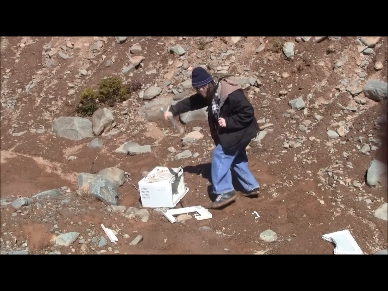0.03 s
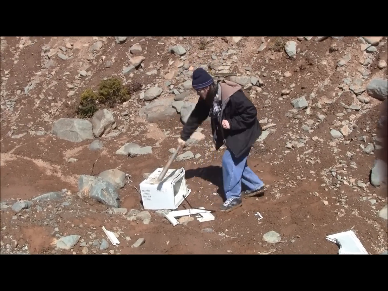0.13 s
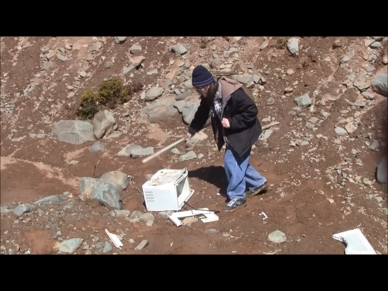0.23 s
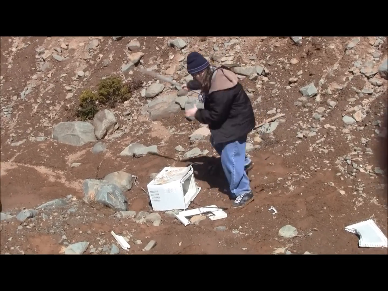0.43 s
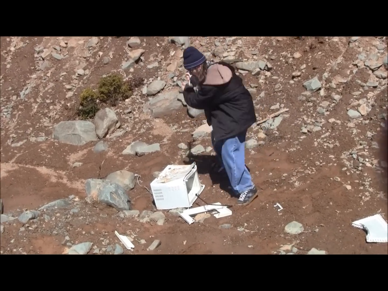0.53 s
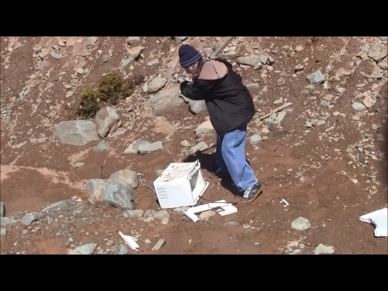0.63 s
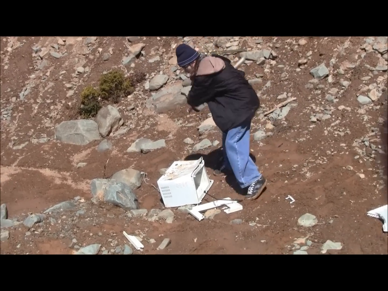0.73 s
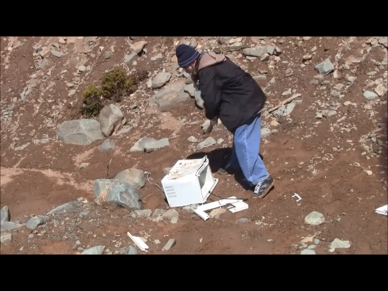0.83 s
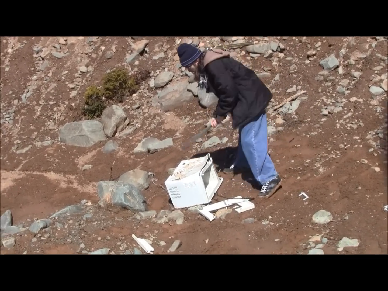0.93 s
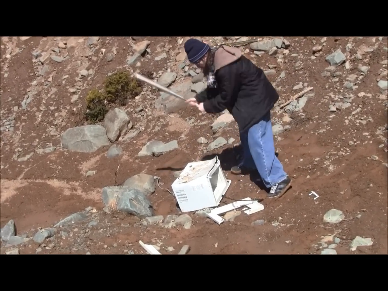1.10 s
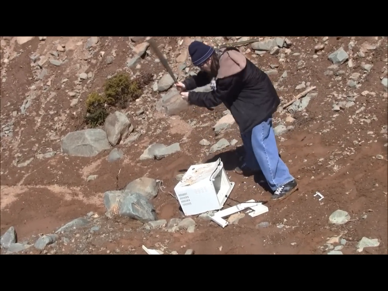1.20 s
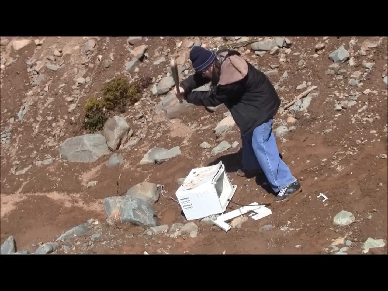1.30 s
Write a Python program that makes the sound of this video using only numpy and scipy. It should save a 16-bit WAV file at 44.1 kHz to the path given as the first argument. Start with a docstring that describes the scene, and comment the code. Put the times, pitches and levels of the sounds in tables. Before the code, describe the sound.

A hammer strikes a sheet-metal appliance casing twice, each blow a sharp crash with a hollow ring echoing off a rocky slope. Metal briefly scrapes and squeals after the second. Gravel shifts faintly underfoot.

```python
"""Hammering a metal casing outdoors

On stony ground, a little right of the microphone, a light clack leads into two blows of a long-handled
hammer on a sheet-metal appliance casing. Each is a crack, a crash of buckling panels and a hollow ring,
scattered back by the rocky slope; the box then rocks and booms. After the second blow metal scrapes and
squeals on metal. Wider in the stereo image, gravel shifts underfoot over a faint outdoor rush."""
import sys
import numpy as np
from scipy import signal
from scipy.io import wavfile

SR = 44100
rng = np.random.default_rng(int(sys.argv[2]) if len(sys.argv) > 2 else 0)


def put_to_file(sound):
    """Save the sound as 16-bit audio at rate SR, in the file named by the first command-line argument."""
    columns = np.atleast_2d(sound).T  # one column per channel
    safe = np.clip(columns, -1, 1)
    whole_steps = np.round(safe * 32767)
    wavfile.write(sys.argv[1], SR, whole_steps.astype(np.int16))


N = 59535
TIME = np.arange(N) / SR
BAND_EDGES_HZ = 25 * 2 ** (np.arange(29) / 3)

# stereo width at the microphone: (frequency [Hz], side of the casing [dB], side of air and ground [dB])
STEREO_WIDTH = [(60, -18, -13), (150, -37, -10), (500, -16, -4.5), (1200, -21.5, -9.5), (4000, -22, -9.5),
                (9500, -7.5, -10)]
# outdoor rush: (frequency [Hz], spectral density [dB])
AIR_SPECTRUM = [(25, -35), (60, -14.5), (120, -7), (220, 1), (550, 2.5), (1000, 0), (1700, -4),
                (3000, -15.5), (6000, -26), (10000, -25), (15000, -40)]
# grinding stones: (frequency [Hz], spectral density [dB])
GRAVEL_SPECTRUM = [(200, -29), (900, 1), (2000, 2), (4000, 0), (6300, -8), (9500, -3), (15000, -21)]
# gravel shifting underfoot: (peak time [s], level [dB], rise [s], t60 [s], brightness [dB/octave])
GRAVEL_SCUFFS = [(.068, -55.5, 0.004, 0.36, 4), (0.131, -40.5, 0.011, 0.35, -3),
                 (.385, -48.5, 0.0037, 0.072, 4), (0.456, -52, 0.027, 0.5, 2.5),
                 (.635, -51, .025, 0.13, -1.5), (.755, -61, 0.017, 0.086, 4), (.868, -58.5, 0.012, 1, 3.5),
                 (1.232, -58.5, 0.012, 0.17, 6), (1.256, -41.5, 0.0035, 0.18, -5)]
# resonances of the light clack: (frequency [Hz], width [Hz], gain [dB])
CLACK_RESONANCES = [(210, 28, 2.5), (608, 76, 3), (1330, 150, 5), (2760, 1200, -6.5), (4180, 870, -4),
                    (8780, 1070, -4.5)]
# pressure of metal sliding on metal: (time [s], level [dB])
SCRAPE_PRESSURE = [(.99, -73), (1.02, -37), (1.05, -27.5), (1.10, -29.5), (1.125, -32.5), (1.155, -37),
                   (1.19, -43), (1.23, -57.5)]
# hiss of the scrape: (frequency [Hz], spectral density [dB])
SCRAPE_SPECTRUM = [(100, -28), (220, 5.5), (330, 9.5), (600, 13), (1000, 2), (1600, 6.5), (3000, -6),
                   (4500, -6), (6800, -15.5), (9500, -10.5), (15000, -28)]
# squeals where the metal catches: (peak time [s], frequency [Hz], level [dB], t60 [s])
SCRAPE_SQUEALS = [(1.025, 7620, -47, .09), (1.079, 7720, -33, .1), (1.14, 7830, -47, .09),
                  (1.025, 4450, -44, .2), (1.075, 4410, -38, .16), (1.088, 5930, -46, .18),
                  (1.075, 3660, -44, .26), (1.163, 3670, -46, .19), (1.14, 4280, -48, .42),
                  (1.077, 9220, -42, .12), (1.143, 9580, -47, .11), (1.045, 9780, -44, .07),
                  (1.095, 5050, -44, .11), (1.10, 11900, -49, .09), (1.045, 6340, -47, .12),
                  (1.045, 2230, -43, .3)]
# panels booming as the box rocks: (time [s], level [dB], settled frequency [Hz], t60 [s])
PANEL_BOOMS = [(.289, -27, 519, 0.67), (.31, -37, 202.8, 0.87), (.96, -27, 221, 0.34),
               (1.015, -26, 570.6, 0.51), (1.03, -29.5, 212.6, 0.34), (1.058, -22.5, 597, 0.15),
               (1.06, -28.5, 461.5, 0.34), (1.132, -27.5, 524.3, 0.26), (1.20, -38, 561.8, 0.62),
               (1.225, -41.5, 203.2, 0.48)]
# ringing modes of the casing: (frequency [Hz], first blow [dB], second blow [dB], t60 [s])
CASING_MODES = [(181.5, -14, -10.5, 0.66), (205.8, -15, -12, 1), (218.7, -6, -9, 0.3),
                (453, -3.5, 5.5, 0.15), (495, 0, -19, 0.51), (514, -6, -14, 0.43), (540, -3.5, -11.5, 0.46),
                (587.4, 2.5, -14, 0.35), (662, 7, 2, 0.12), (748.5, -16, 0.5, 0.23), (957, 9, -1.5, 0.078),
                (1005, -6.5, -9, 0.31), (1190, -3, -16, 0.068), (1248, 1.5, -0.5, 0.21),
                (1415, 7, 4.5, 0.11), (1573, -6, -5, 0.14), (1659, 6, 0.5, 0.14), (2092, -7, -1, 0.11),
                (2229, -6, -5, 0.17), (2265, -22, 0.5, 0.053), (2650, -28, -17, 0.3)]
# the panels' dense modes and their echo off the slope:
# (frequency [Hz], crash density [dB], crash t60 [s], echo density [dB], echo t60 [s])
PANEL_SPECTRUM = [(50.6, -44, 0.1, -48, 0.43), (106, -45, 0.11, -16.5, 0.66), (215, -10.5, 0.36, -2, 0.78),
                  (365, -27.5, 0.23, -15.5, 0.76), (511, 5, 0.098, 5, 0.69), (814, -11.5, .13, -3.5, 0.42),
                  (1440, 3.5, 0.14, -4, 0.4), (2310, -6.5, 0.17, -11, 0.34),
                  (3800, -5.5, 0.12, -18.5, 0.42), (6800, -21.5, 0.15, -26, 0.36),
                  (9040, -13.5, 0.13, -24, 0.33), (14600, -28, 0.075, -39, 0.36)]
# modes of the dented spot: (frequency [Hz], level [dB], t60 [s])
DENT_MODES = [(580, -13, 0.016), (1364, -1.5, 0.0096), (1620, -8.5, 0.012), (3330, -11, 0.0047)]
# hard contacts of hammer, casing and ground: (time [s], dent gain [dB], pitch [ratio], click gain [dB])
CONTACTS = [(0.2045, 0.5, 0.96, -21), (0.2078, -3, 0.93, -21), (0.2089, 0, 0.926, -20),
            (0.2142, -7, 0.61, -22), (0.2269, -1.5, 0.51, -22), (.2298, -7, 0.834, -19),
            (0.2365, -15, 0.74, -16), (.9299, 3.5, 1.06, 1), (0.9316, -4.5, 1.18, -3.5),
            (0.9367, -6, 0.64, -12)]
# hammer blows: (time [s], crash level [dB], brightness [dB/octave], ring level [dB], echo level [dB])
HAMMER_BLOWS = [(0.2042, -13, -0.5, -22, -23.5), (0.9288, -11.5, -1, -21.5, -24.5)]


def from_db(db):
    """Decibels to gain."""
    return 10 ** (np.asarray(db) / 20)


def unit_rms(x):
    """Scale to unit rms."""
    return x / np.sqrt(np.mean(x ** 2) + 1e-20)


def at_hz(table, hz, column=1):
    """Read a column on a log-frequency axis."""
    table = np.array(table)
    return np.interp(np.log(hz), np.log(table[:, 0]), table[:, column])


def decay(start, t60):
    """Silence until the start, then an exponential fall."""
    return (TIME >= start) * np.exp(-np.log(1000) * np.maximum(TIME - start, 0) / t60)


def swell(peak, rise, t60):
    """An exponential rise up to the peak time, then a fall."""
    return np.exp(np.minimum(TIME - peak, 0) / rise) * (TIME < peak) + decay(peak, t60)


def ring(start, hz, t60):
    """One struck mode."""
    return decay(start, t60) * np.sin(2 * np.pi * hz * (TIME - start))


def resonate(x, hz, width_hz):
    """A resonance with unit gain at its peak."""
    radius = np.exp(-np.pi * width_hz / SR)
    gain = (1 - radius ** 2) / 2
    return signal.lfilter([gain, 0, -gain], [1, -2 * radius * np.cos(2 * np.pi * hz / SR), radius ** 2], x)


def grains(per_s):
    """Random clicks of uneven size."""
    clicks = (rng.random(N) < per_s / SR) * rng.choice([-1, 1], N)
    return clicks * from_db(1.5 * np.minimum(rng.exponential(1, N), 4)) + 1e-18


def bands(table, tilt_db=0, column=1, per_s=None, wide=False):
    """Stereo third-octave bands of noise or grains as (Hz, sound), together near unit rms."""
    centres = np.sqrt(BAND_EDGES_HZ[1:] * BAND_EDGES_HZ[:-1])
    gains = from_db(at_hz(table, centres, column) + tilt_db * np.log2(centres)) * np.sqrt(centres)
    gains /= np.linalg.norm(gains)
    widths = from_db(at_hz(STEREO_WIDTH, centres, column=2 if wide else 1))
    if per_s is None:
        sources = rng.standard_normal((2, 2, N))
    else:
        sources = [[grains(per_s), grains(per_s)] for _ in range(2)]
    for k, hz in enumerate(centres):
        bandpass = signal.butter(2, BAND_EDGES_HZ[k:k + 2], "band", fs=SR, output="sos")
        mid, side = signal.sosfilt(bandpass, sources[k % 2])  # neighbouring bands stay independent
        yield hz, gains[k] * (unit_rms(mid) + widths[k] * unit_rms(side) * [[1], [-1]])


def outdoor_rush():
    """Faint, steady air all around the microphone."""
    return from_db(-48.5) * sum(band for _, band in bands(AIR_SPECTRUM, wide=True))


def gravel():
    """Small stones grind underfoot in short swells."""
    out = 0
    for peak, db, rise, t60, tilt_db in GRAVEL_SCUFFS:
        grit = sum(band for _, band in bands(GRAVEL_SPECTRUM, tilt_db, per_s=2200, wide=True))
        out += from_db(db) * swell(peak, rise, t60) * grit
    return out


def ground_thuds():
    """The ground takes each blow with a faint thud."""
    return from_db(-40) * sum(ring(start, hz=77, t60=0.039) for start, *_ in HAMMER_BLOWS)


def clack():
    """A short hard rattle in a few broad resonances, ahead of the first blow."""
    rattle = grains(per_s=6900)
    body = sum((-1) ** k * from_db(db) * resonate(rattle, hz, width)
               for k, (hz, width, db) in enumerate(CLACK_RESONANCES))
    return from_db(-23) * decay(start=0.0958, t60=0.056) * unit_rms(body)


def jingle(slips, range_hz=(1992, 10220)):
    """Slips ring many close, high modes in the sheet's thin edges."""
    modes_hz = np.geomspace(*range_hz, 48) * rng.uniform(0.98, 1.02, size=48)
    gains = from_db(at_hz(SCRAPE_SPECTRUM, modes_hz)) * np.sqrt(modes_hz)
    return unit_rms(sum(rng.choice([-1, 1]) * gain * resonate(slips, hz, width_hz=34)
                        for hz, gain in zip(modes_hz, gains)))


def squeal(hz, width_hz=64):
    """Catching metal sings a wavering tone: narrow noise with its level evened out."""
    tone = resonate(resonate(rng.standard_normal(N), hz, width_hz), hz, width_hz)
    envelope = np.abs(signal.hilbert(tone))
    return unit_rms(tone / (envelope + 0.5 * tone.std()))


def scrape():
    """Metal slips on metal in dense jerks and catches in brief squeals that ring on."""
    pressure = from_db(np.interp(TIME, *np.transpose(SCRAPE_PRESSURE), left=-120, right=-120))
    squeals = sum(from_db(db) * swell(peak, rise=0.0069, t60=t60) * squeal(hz)
                  for peak, hz, db, t60 in SCRAPE_SQUEALS)
    edges = from_db(-9) * pressure.std() * jingle(pressure * grains(per_s=500))
    hiss = pressure * sum(band for _, band in bands(SCRAPE_SPECTRUM, per_s=1800))
    return hiss + edges + squeals


def rocking_booms(rise_s=0.0033, sharp_share=0.0723, settle_s=0.046):
    """As the box rocks, its large panels flex and sound hollow tones that start sharp and settle."""
    out = 0
    for start, db, hz, t60 in PANEL_BOOMS:
        age = np.maximum(TIME - start, 0)
        cycles = hz * (age + sharp_share * settle_s * (1 - np.exp(-age / settle_s)))
        envelope = (1 - np.exp(-age / rise_s)) * decay(start, t60)
        out += from_db(db) * envelope * np.sin(2 * np.pi * cycles)
    return out


def slope_echo(rise_s=0.021, fall_after_s=0.065):
    """From farther off, the rocky slope scatters each crash back as a duller, longer tail."""
    out = 0
    for start, _, tilt_db, _, echo_db in HAMMER_BLOWS:
        fall_start = start + fall_after_s
        onset = np.clip((TIME - start) / rise_s, 0, 1) * (TIME < fall_start)
        for hz, band in bands(PANEL_SPECTRUM, tilt_db, column=3):
            tail = decay(fall_start, t60=at_hz(PANEL_SPECTRUM, hz, column=4))
            out += from_db(echo_db) * (onset + tail) * band
    return out


def casing_ring():
    """Each blow rings the same hollow modes, weighted by where it lands."""
    out = 0
    for blow, (start, _, _, ring_db, _) in enumerate(HAMMER_BLOWS):
        for hz, *levels_db, t60 in CASING_MODES:
            out += rng.choice([-1, 1]) * from_db(ring_db + levels_db[blow]) * ring(start, hz, t60)
    return out


def panel_crashes():
    """The panels buckle under the hammer; their dense modes flare and die quickly."""
    out = 0
    for start, crash_db, tilt_db, _, _ in HAMMER_BLOWS:
        for hz, band in bands(PANEL_SPECTRUM, tilt_db):
            out += from_db(crash_db) * decay(start, t60=at_hz(PANEL_SPECTRUM, hz, column=2)) * band
    return out


def contact_cracks():
    """Each hard contact gives a sharp click and a few cycles of the dented spot."""
    out = 0
    for start, dent_db, pitch, click_db in CONTACTS:
        dent = sum(from_db(db) * ring(start, hz * pitch, t60) for hz, db, t60 in DENT_MODES)
        click = decay(start, t60=0.0072) * resonate(rng.standard_normal(N), hz=3550, width_hz=2500)
        out += from_db(click_db) * click - from_db(dent_db) * resonate(dent, hz=1260, width_hz=2640)
    return out


def scene(low_cut_hz=157, pan_db=0.5):
    """Air, ground and metal as they reach the microphone, a little right of centre."""
    background = outdoor_rush() + gravel() + ground_thuds()
    blows = slope_echo() + casing_ring() + panel_crashes() + contact_cracks()
    metal = clack() + scrape() + rocking_booms() + blows
    low_cut = signal.butter(2, low_cut_hz, "high", fs=SR, output="sos")  # a small box has little bass
    return (background + signal.sosfilt(low_cut, metal)) * from_db([[-pan_db], [pan_db]])


def record(dry, stopband_hz=16300):
    """The loudest peaks overload at full scale; the highest treble is cut."""
    flattened = dry / (1 + dry ** 10) ** (1 / 10)
    return signal.sosfilt(signal.cheby2(12, 60, stopband_hz, fs=SR, output="sos"), flattened)


dry = scene()
out = record(dry)
put_to_file(out)
```